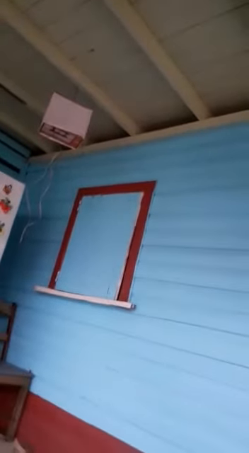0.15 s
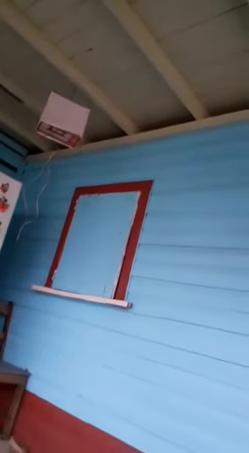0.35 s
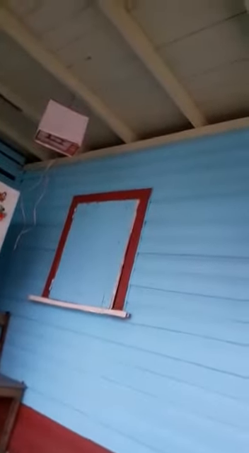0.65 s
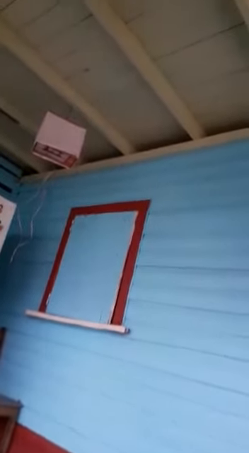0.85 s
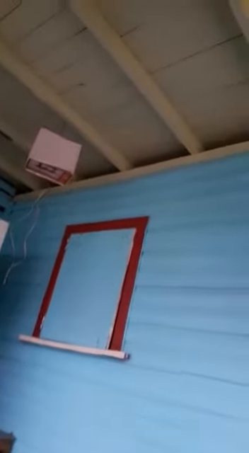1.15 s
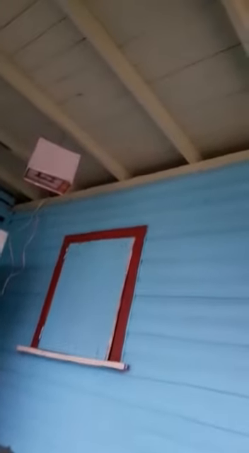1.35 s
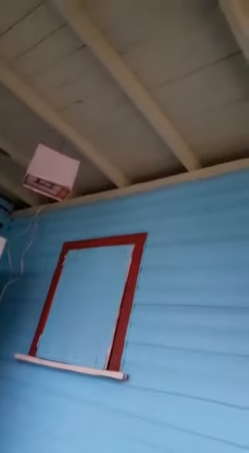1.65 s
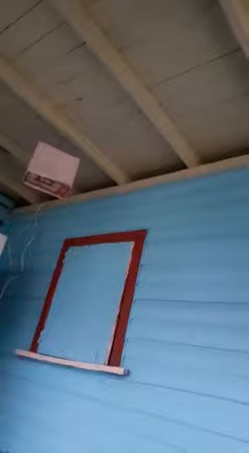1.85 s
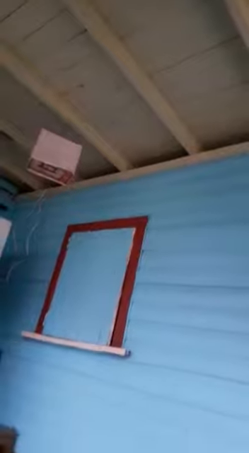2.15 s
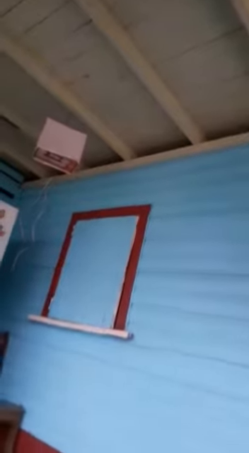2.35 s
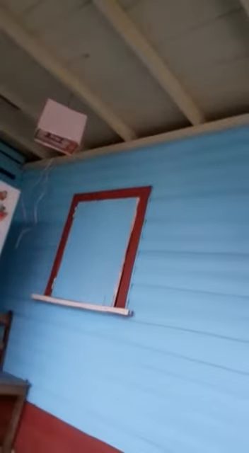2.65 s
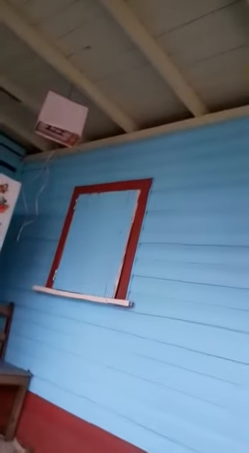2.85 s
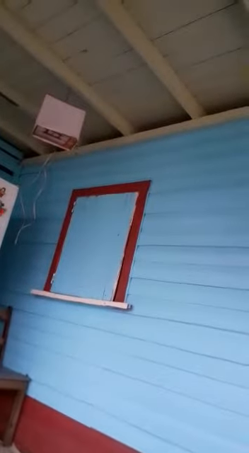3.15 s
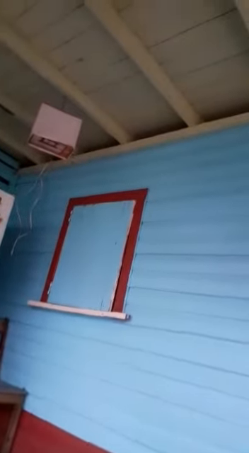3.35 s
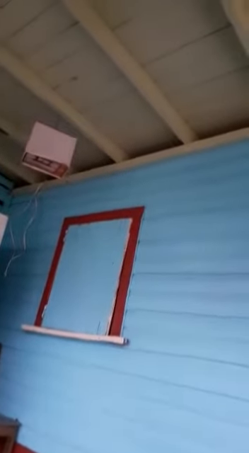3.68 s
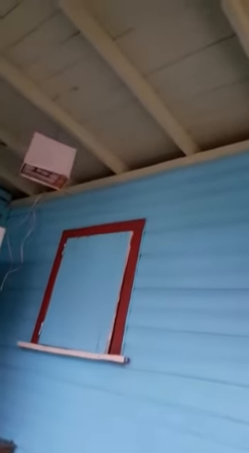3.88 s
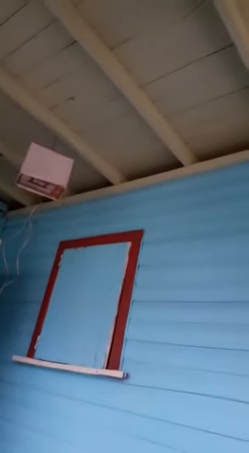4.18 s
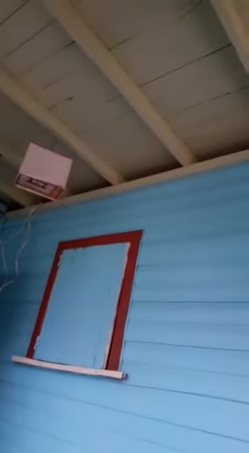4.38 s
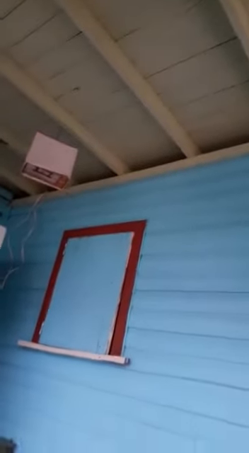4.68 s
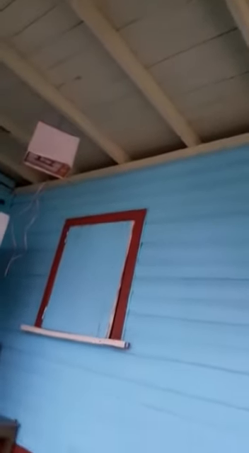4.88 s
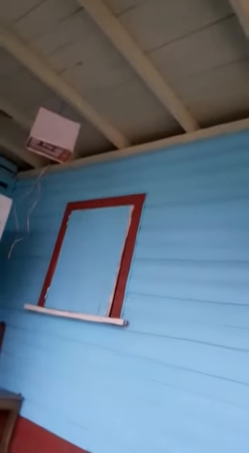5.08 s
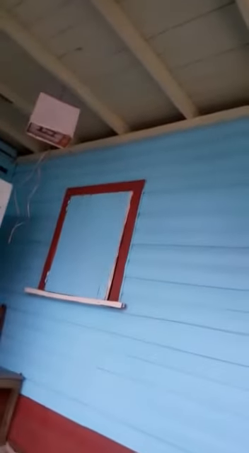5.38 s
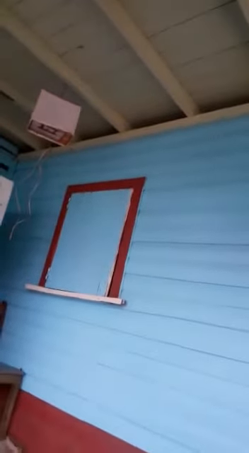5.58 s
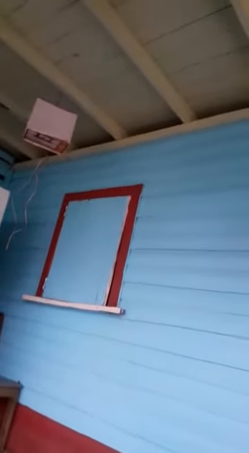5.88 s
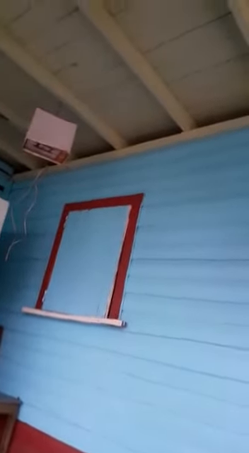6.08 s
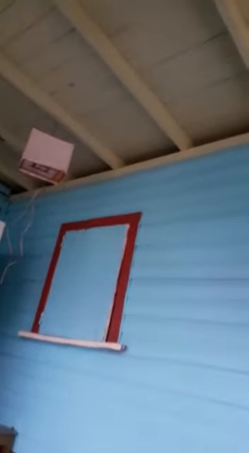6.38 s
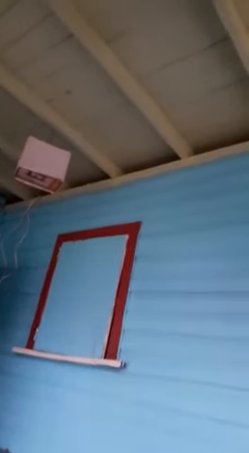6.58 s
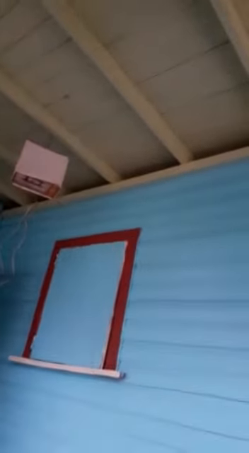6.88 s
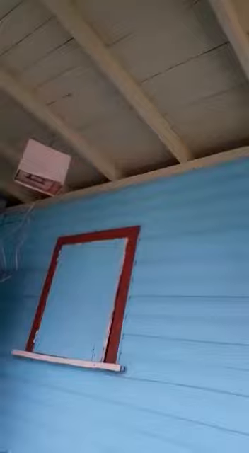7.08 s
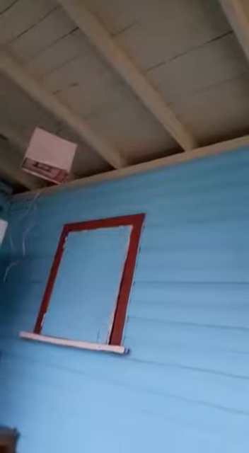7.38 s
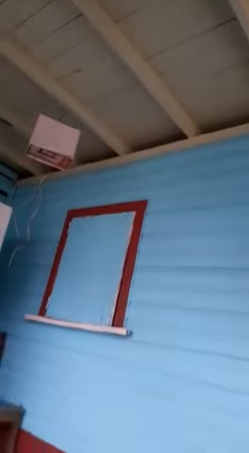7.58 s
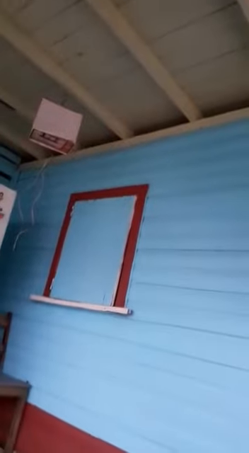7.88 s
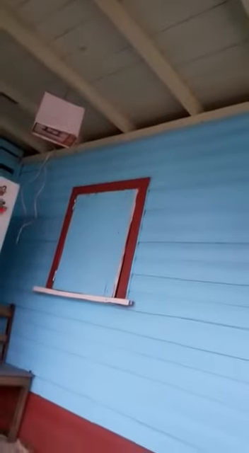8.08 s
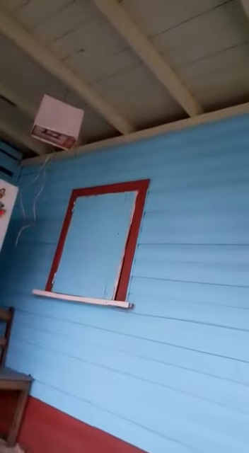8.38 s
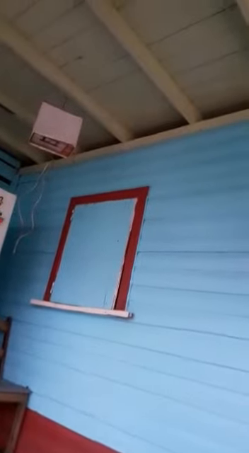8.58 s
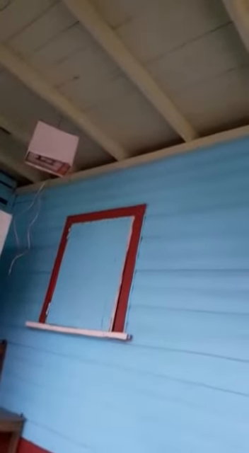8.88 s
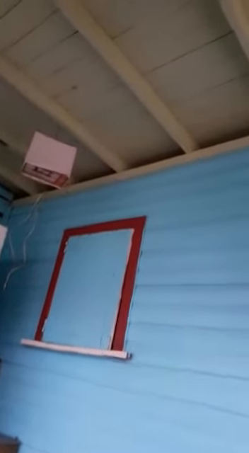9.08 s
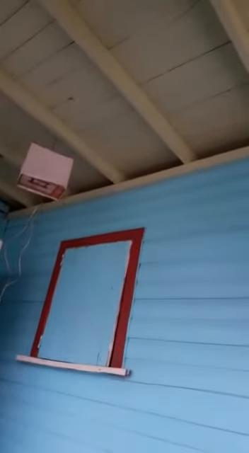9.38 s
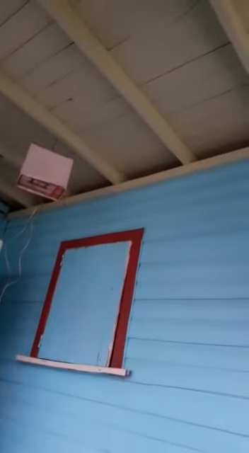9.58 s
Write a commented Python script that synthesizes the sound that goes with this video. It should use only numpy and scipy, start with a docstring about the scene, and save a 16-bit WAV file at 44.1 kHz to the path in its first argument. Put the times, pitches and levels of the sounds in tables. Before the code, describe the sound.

A quiet wooden room with a low airy rush, faint motor hum and high outdoor hiss. Thin high whistles and blurred burry calls come from distant birds, with soft wooden bumps and tiny ticks. Near seven seconds a close caged songbird starts timidly, then sings bright rising whistles, four rapid down-sweeps and a short falling note. A handheld stereo microphone catches the room's short reflections.

```python
"""In a wooden room a caged songbird sings six rising whistles, four quick down-sweeps and a falling last note.
Other birds call further off, some in thin high whistles, some burry and blurred by the walls.
The birds are gliding tones in room reflections; soft wooden bumps, ticks and scrapes are struck or rubbed noise.
A faint motor hum of wavering sines lies under a low rush, an outdoor wash and a high hiss of shaped noise."""
import sys
import numpy as np
from scipy import signal
from scipy.fft import rfft, irfft
from scipy.io import wavfile
from scipy.ndimage import uniform_filter1d

SR = 44100
rng = np.random.default_rng(int(sys.argv[2]) if len(sys.argv) > 2 else 0)


def output_pcm(signal):
    """Save a mono or channel-first signal as 16-bit PCM at the path in sys.argv[1].

    Samples are clipped to [-1, 1] before scaling.
    """
    pcm = np.clip(np.atleast_2d(signal).T, -1, 1) * 32767
    wavfile.write(sys.argv[1], SR, np.round(pcm).astype(np.int16))


N = 429518
TIME = np.arange(N) / SR

# Source levels throughout are dry: before room and panning.
# near bird's whistles, six rising and the last falling: t/s, glide/s, hold/s, start f/Hz, f after glide/Hz,
# final f/Hz, start level/dB, lead-in/s, lead-in level/dB, full voice level/dB, fade by the end/dB
WHISTLES = [ (6.797, 0.13, 0.043, 3760, 4704, 4620, -69, 0.028, -53, -45, 6.5),
            (7.126, 0.2, 0.055, 3505, 4564, 4474, -63, 0.06, -45.5, -27, 5.5),
            (7.536, .205, 0.038, 3383, 4570, 4592, -54.5, 0.12, -22, -14, 2),
            (7.98, .222, 0.036, 3086, 4467, 4294, -66.5, .11, -22, -19, 4),
            (8.371, .175, .03, 3016, 3693, 3610, -47, 0.11, -33.5, -21, 8),
            (8.671, 0.14, .056, 3800, 5267, 4415, -50, 0.032, -31, -19.5, 2),
            (9.326, 0.12, 0.016, 3476, 2746, 2650, -48, 0.021, -41.5, -31.5, 2)]
# a whistle creeps in softly, opens suddenly, glides in an S-curve and hooks to its final pitch
CREEP_BEND, OPEN_S, GLIDE_EASE, HOOK_S = 1.7, 0.012, 0.34, 0.024
# at its very end a whistle dies away
RELEASE_S, RELEASE_DB = 0.019, -9.5
# near bird's quick down-sweeps: t/s, start f/Hz, level/dB
SWEEPS = [(9.004, 5770, -26.5), (9.078, 5770, -27), (9.160, 5490, -26), (9.250, 4710, -29.5)]
# each falls ever faster to the same low pitch and is loudest in the middle
SWEEP_S, SWEEP_END_HZ, SWEEP_BEND, SWEEP_EDGE_DB = 0.033, 2310, 2.05, -19.5
# colour of the near bird's overtones on the way to the microphone: f/Hz, level/dB
OVERTONE_COLOUR = [(5500, 0), (6300, -8), (7300, 1), (9000, 4.5), (10700, -12), (12500, -1), (14000, 0.5),
                   (15600, 9.5)]
# strength of the straight path as the near bird turns its head: t/s, level/dB
FACING = [(6.9, -16), (7.3, 0.5), (7.75, -2), (8.8, -1.5), (9.05, -10), (9.45, 4)]

# thin high whistles of other birds: t/s, length/s, start f/Hz, end f/Hz,
# bend (1 straight, more turns late), level/dB
THIN_WHISTLES = [(0.321, 0.16, 6330, 5300, 1.9, -52), (.78, .33, 6855, 5450, 3.8, -53.5),
                 (1.47, .29, 6960, 7320, 1.1, -51.5), (2.09, .30, 7320, 7940, 1.0, -53.5),
                 (4.69, 0.082, 5180, 3260, 1.1, -63.5), (9.468, 0.38, 6845, 5500, 3.8, -60)]
THIN_EDGE_DB = -1.5

# distant burry slurs: t/s, length/s, start f/Hz, level/dB
SLURS = [(0, .08, 3620, -61), (0, 0.087, 7900, -57.5), (0.262, 0.15, 4160, -57.5),
         (.657, 0.073, 8000, -58.5), (0.678, 0.14, 4165, -57.5), (1.086, .15, 4155, -59),
         (1.398, .17, 4165, -57.5), (1.802, .15, 4244, -57), (2.216, .18, 4144, -57.5),
         (2.384, 0.083, 8230, -60), (2.808, .10, 5130, -61), (4.592, 0.054, 4100, -70),
         (5.069, 0.098, 4820, -63), (6.661, 0.12, 8230, -68), (8.225, .08, 8400, -57)]
# every slur ends at the same share of its starting pitch
SLUR_DROP, SLUR_BURR_HZ = 0.73, 308
# distant long dives that grow louder as they fall: t/s, length/s, level at the end/dB
DIVES = [(7.42, .27, -53.5), (7.83, .26, -54), (8.549, .24, -56), (9.326, 0.12, -53.5)]
DIVE_FROM_HZ, DIVE_TO_HZ, DIVE_SWELL_DB, DIVE_BURR_HZ = 10100, 6150, 19, 210
# distant single peeps: t/s, length/s, f/Hz, level/dB
PEEPS = [(.57, 0.028, 8470, -62), (1.155, 0.045, 9220, -65), (1.313, 0.082, 5830, -66),
         (1.62, .14, 9400, -73), (1.828, .18, 9600, -69), (2.19, 0.058, 5800, -67),
         (7.765, .045, 6180, -58.5), (8.17, 0.082, 6130, -59), (8.34, 0.12, 6120, -59.5),
         (9.014, 0.144, 6270, -54)]
PEEP_DROP, PEEP_BURR_HZ = 0.96, 95
# a peep swells from a soft start (against its middle)
PEEP_ONSET_DB, PEEP_END_DB = -6.5, 2
# two distant birds each repeat one peep: first t/s, until t/s, period/s, length/s, f/Hz, level/dB, burr/Hz
PEEP_SERIES = [(2.74, 7, .392, 0.14, 6930, -73, 170), (1.30, 7.3, .925, .19, 5130, -71.5, 125)]

# soft bumps on wood: t/s, peak level/dB, bass boost of modes below 150 Hz/dB
BUMPS = [(2.005, -37.5, 2), (2.288, -41.5, -2), (2.513, -43.5, 9), (2.628, -38, -2), (3.175, -42, -3),
         (3.485, -45, -4), (3.904, -40, -18), (4.344, -44.5, 0)]
# ringing modes of the wood: f/Hz, relative level/dB, t60/s
WOOD_MODES = [(71.5, -16, 0.48), (112, -15.5, 0.34), (172, -5, 0.25), (289, -2, 0.22), (426, 4, 0.049),
              (513, -2, 0.073), (652, -5.5, 0.056), (817, -6, 0.071), (1270, -7, .025), (1830, 2, 0.022)]
# small dry ticks: t/s, peak level/dB
TICKS = [(1.765, -52), (2.281, -43), (2.305, -46), (2.812, -48), (3.213, -48), (3.24, -51), (3.29, -53),
         (3.489, -55), (3.813, -54)]
# brief soft scrapes: t/s, length/s, resonance f/Hz, level/dB
SCRAPES = [(2.552, 0.033, 1820, -61), (4.058, 0.11, 1830, -65), (4.326, 0.086, 1810, -65),
           (7.241, 0.11, 1630, -70.5)]

# motor hum lines: f/Hz, rms level/dB
HUM_LINES = [(119.5, -74), (202, -67), (242.2, -57), (363, -69), (473, -74)]
# relative spectrum of the indoor rush: f/Hz, level per Hz/dB
RUSH_SPECTRUM = [(25, -44), (40, -28), (60, -13), (120, -11), (185, -9), (228, 1.9), (262, -4), (345, -3),
                 (430, -11), (570, -18), (1200, -32), (5000, -50)]
# how alike the two sides of the rush are: f/Hz, likeness (0-1)
LIKENESS = [(60, .93), (150, .97), (300, .88), (600, .7), (1200, .4), (8000, 0)]
# relative spectrum of the outdoor wash: f/Hz, level per Hz/dB
WASH_SPECTRUM = [(60, -49.5), (280, -27), (550, -5.5), (820, 0.5), (1150, -4.5), (1450, -9.5), (2000, -13),
                 (2700, -22.5), (5000, -35), (12000, -30)]
# shared base level of rush and wash, each with its own offset: t/s, level/dB
BACKGROUND_LEVEL = [(0.0, -64), (4.31, -65), (4.61, -66.5), (7.35, -66), (9.74, -67)]
# relative spectrum of the high outdoor hiss with a faint insect band: f/Hz, level per Hz/dB
HISS_SPECTRUM = [(300, -35.5), (2000, -8.5), (3200, 8.5), (5600, 4), (6900, 10), (7350, 11), (7750, 4),
                 (9000, 4.5), (10200, -7), (15500, -2.5)]
# level of the hiss: t/s, level/dB
HISS_LEVEL = [(0, -62.5), (2.5, -62.5), (2.75, -67.5), (6.4, -71.5), (7.3, -66), (9.74, -67)]
TOP_HZ = 15760


def undb(db):
    """Decibels to gain."""
    return 10 ** (np.asarray(db) / 20)


def curve(rows):
    """Rows (t/s, value) joined by straight lines."""
    return np.interp(TIME, *np.transpose(rows))


def on_log_axis(rows, count=N):
    """Rows (f/Hz, value) read at every bin of a spectrum."""
    hz, value = np.transpose(rows)
    bins = np.fft.rfftfreq(count, 1 / SR)
    return np.interp(np.log(bins + 1), np.log(hz), value)


def noise(rows, count=N):
    """Noise of rms 1, coloured by a spectrum (f/Hz, level/dB)."""
    white = rng.standard_normal(count)
    x = irfft(rfft(white) * undb(on_log_axis(rows, count)), count)
    return x / x.std()


def walk(rate, count=N):
    """Smooth chance of spread near 1, heading for a new value rate times a second."""
    step = np.arange(count) / SR * rate
    return np.interp(step, np.arange(4096), rng.standard_normal(4096))


def add(track, start, sound):
    """Mix a sound into a track from a start time on."""
    i = int(np.clip(start * SR, 0, N - 1))
    track[i:i + len(sound)] += sound[:N - i]


def pan(x, right_db):
    """Lean a sound to the right by a level difference; negative leans left."""
    return x * undb(np.array([[-right_db], [right_db]]) / 2)


def room(x, direct, wet_db, t60, lag_s=0.00016):
    """The straight path reaches the left side first; dense decaying reflections off the boards follow."""
    t = np.arange(SR) / SR
    build_up = 1 - np.exp(-(t / 0.004) ** 2)
    tail = rng.standard_normal((2, SR)) * undb(-60 * t / t60) * build_up
    tail = tail * undb(wet_db) / np.sqrt(np.sum(tail ** 2, axis=1, keepdims=True))
    straight = np.array([x, np.roll(x, int(lag_s * SR))])
    return direct * straight + signal.fftconvolve(x[None], tail, axes=1)[:, :N]


def whistle(note, overtones=(), waver=0.003, flutter_db=1.0, edge_s=0.004, waver_rate=220):
    """One note of the syrinx: a tone along a contour (t/s, f/Hz, level/dB), burry from quick pitch waver."""
    s, hz, db = np.transpose(note)
    s = np.sort(s)
    t = np.arange(s[0], s[-1] + 1 / SR, 1 / SR)
    level = np.interp(t, s, db)
    smooth_hz = uniform_filter1d(np.interp(t, s, hz), size=180)
    pitch = smooth_hz * (1 + waver * walk(waver_rate, len(t)))
    phase = 2 * np.pi * np.cumsum(pitch) / SR
    tone = np.sin(phase)
    for k, overtone_db in enumerate(overtones, 2):
        # harder blowing brings out the overtones
        strength = undb(overtone_db + 0.083 * (level + 24.0))
        below_limit = k * pitch < SR / 2
        tone = tone + strength * np.sin(k * phase) * below_limit
    to_edge = np.minimum(t - t[0], t[-1] - t)
    gate = np.sin(np.pi / 2 * np.clip(to_edge / edge_s, 0, 1)) ** 2
    return np.sqrt(2) * tone * gate * undb(level + flutter_db * walk(87.5, len(t)))


def caged_bird():
    """Loud syrinx whistles whose third harmonic is driven harder than the second and fourth."""
    song_track, facing = np.zeros(N), undb(curve(FACING))
    for note in song():
        sound = whistle(note, overtones=(-36, -31, -46), waver=0.0052, flutter_db=3.5, edge_s=0.0031)
        add(song_track, note[0][0], sound)
    coloured = irfft(rfft(song_track) * undb(on_log_axis(OVERTONE_COLOUR)), N)
    above_10k = np.fft.rfftfreq(N, 1 / SR) > 10000
    overtones = irfft(rfft(coloured) * above_10k, N)
    body = coloured - overtones
    voice = room(body, direct=0.9 * facing, wet_db=-9.5, t60=0.31, lag_s=0.00019)
    # the nearest wall and the ceiling answer within a few milliseconds and blur the quick sweeps
    nearby = room(body, direct=0, wet_db=-7.5, t60=0.09)
    # the highest overtones beam from the beak, so they fade most when the head turns
    sparkle = room(overtones * facing, direct=0.7, wet_db=0, t60=0.22)
    return pan(voice + nearby, right_db=4.5) + pan(sparkle, right_db=-1.5)


def song():
    """The near bird's phrase: its whistles and a run of down-sweeps."""
    sweeps = [glide(start, SWEEP_S, hz, SWEEP_END_HZ, SWEEP_BEND, db, SWEEP_EDGE_DB)
              for start, hz, db in SWEEPS]
    return [sung(*row) for row in WHISTLES] + sweeps


def sung(start, glide_s, hold_s, from_hz, to_hz, final_hz, start_db, lead_s, lead_db, db, fade_db):
    """Contour of a whistle that opens up while it glides, then hooks to its final pitch."""
    t = np.linspace(0, glide_s + hold_s, 120)
    u = np.minimum(t / glide_s, 1)
    way = u + GLIDE_EASE * (np.sin(np.pi / 2 * u) ** 2 - u)
    hook = (final_hz - to_hz) * np.clip((t - glide_s) / HOOK_S, 0, 1)
    hz = from_hz + (to_hz - from_hz) * way + hook
    creep = (start_db - lead_db) * np.maximum(1 - t / lead_s, 0) ** CREEP_BEND
    opening = np.interp(t, [lead_s, lead_s + OPEN_S, t[-1]], [lead_db, db, db - fade_db])
    release = RELEASE_DB * np.maximum(1 - (t[-1] - t) / RELEASE_S, 0)
    return np.transpose([start + t, hz, creep + opening + release])


def glide(start, length, from_hz, to_hz, bend, db, edge_db):
    """Contour of a one-way glide, loudest in the middle; with more bend it turns later."""
    u = np.linspace(0, 1, 30)
    hz = from_hz + (to_hz - from_hz) * u ** bend
    level = db + edge_db * (2 * u - 1) ** 2
    return np.transpose([start + length * u, hz, level])


def thin_bird():
    """Very high glides without overtones, from across the room."""
    out = np.zeros(N)
    for row in THIN_WHISTLES:
        note = glide(*row, THIN_EDGE_DB)
        add(out, note[0][0], whistle(note, waver=0.008, flutter_db=2, edge_s=0.008))
    heard = room(out, direct=0.5, wet_db=-1.5, t60=0.42)
    return pan(heard, right_db=6)


def far_birds():
    """Burry calls that arrive almost only by reflection."""
    out = np.zeros(N)
    for note, burr_hz in far_calls():
        mean_hz = np.mean(note, axis=0)[1]
        sound = whistle(note, waver=burr_hz / mean_hz, flutter_db=2.5, edge_s=0.015, waver_rate=600)
        add(out, note[0][0], sound)
    return pan(room(out, direct=0.25, wet_db=4, t60=0.65), right_db=4.5)


def far_calls():
    """Every distant slur, dive and peep as (contour, burr/Hz)."""
    calls = [(slur(start, length, hz, hz * SLUR_DROP, db), SLUR_BURR_HZ)
             for start, length, hz, db in SLURS]
    for start, length, db in DIVES:
        dive = [(start, DIVE_FROM_HZ, db - DIVE_SWELL_DB), (start + length, DIVE_TO_HZ, db)]
        calls.append((dive, DIVE_BURR_HZ))
    calls += [(peep(*row), PEEP_BURR_HZ) for row in PEEPS]
    for first, until, period, length, hz, db, burr_hz in PEEP_SERIES:
        calls += [(peep(start, length, hz, db), burr_hz) for start in np.arange(first, until, period)]
    return calls


def slur(start, length, from_hz, to_hz, db, sag=0.58, onset_db=0.5, end_db=-4):
    """Contour of a call that falls faster in its first half than in its second."""
    middle_hz = from_hz + sag * (to_hz - from_hz)
    return [(start, from_hz, db + onset_db),
            (start + length / 2, middle_hz, db),
            (start + length, to_hz, db + end_db)]


def peep(start, length, hz, db):
    """Contour of a nearly level call that swells."""
    return slur(start, length, hz, hz * PEEP_DROP, db, onset_db=PEEP_ONSET_DB, end_db=PEEP_END_DB)


def bumps():
    """Soft blows: each rings the modes of the wood and scuffs it for a moment."""
    out, t = np.zeros(N), np.arange(SR // 3) / SR
    scuff_spectrum = [(100, -8), (300, 12), (550, 0.5), (900, -3.5), (1400, -10), (3000, -15.5), (9000, -31)]
    for start, db, bass_db in BUMPS:
        # every blow excites slightly different pitches
        detune = 1 + 0.019 * rng.standard_normal(len(WOOD_MODES))
        ring = np.zeros(len(t))
        for (hz, mode_db, t60), k in zip(WOOD_MODES, detune):
            decay = undb(mode_db + bass_db * (hz < 150) - 60 * t / t60)
            ring += decay * np.sin(2 * np.pi * hz * k * t)
        scuff = noise(scuff_spectrum, count=len(t)) * np.exp(-t / 0.03)
        # a soft contact takes a few milliseconds to build up
        blow = (ring + 0.6 * scuff) * (1 - np.exp(-t / 0.0065))
        add(out, start, undb(db) * blow / np.abs(blow).max())
    return pan(room(out, direct=0.87, wet_db=-3, t60=0.15), right_db=5)


def scrapes():
    """Light uneven rubbing: noise that sings in one broad resonance."""
    out = np.zeros(N)
    for start, length, hz, db in SCRAPES:
        count = int(length * SR)
        resonance = [(hz / 3, -22), (hz * 0.9, -10), (hz, 0), (hz * 1.08, -12), (hz * 2, -35)]
        rub = noise(resonance, count=count)
        add(out, start, rub * np.hanning(count) * undb(db + 2.3 * walk(70, count)))
    return pan(room(out, direct=1.0, wet_db=-0.5, t60=0.56), right_db=10)


def ticks():
    """Tiny dry contacts, as of claws and beak on the cage: short bright noise bursts."""
    out, t = np.zeros(N), np.arange(SR // 20) / SR
    for start, db in TICKS:
        grain = noise([(500, -10), (2000, 0), (8000, -1), (15000, -9)], count=len(t))
        tick = grain * t * np.exp(-t / 0.003)
        add(out, start, undb(db) * tick / np.abs(tick).max())
    return room(out, direct=0.8, wet_db=-3, t60=0.25)


def hum():
    """Steady motor lines: sines that swell, sink and drift in pitch a little."""
    lines = np.zeros(N)
    for hz, db in HUM_LINES:
        phase = 2 * np.pi * np.cumsum(hz + 0.5 * walk(4.4)) / SR
        lines += undb(db + 0.86 * walk(4.7)) * np.sin(phase)
    return pan(np.sqrt(2) * lines, right_db=2.6)


def air(rush_db=10.5, wash_db=2):
    """A low rush, alike on both sides in the bass; a diffuse wash and a wide hiss from outside above it."""
    alike = np.clip(on_log_axis(LIKENESS), 0, 1)
    # more likeness puts more of the rush in the middle and less in the side signal
    mid = irfft(rfft(noise(RUSH_SPECTRUM)) * np.sqrt((1 + alike) / 2), N)
    side = irfft(rfft(noise(RUSH_SPECTRUM)) * np.sqrt((1 - alike) / 2), N)
    background_db = curve(BACKGROUND_LEVEL)
    rush = np.array([mid + side, mid - side]) * undb(background_db + rush_db + 0.7 * walk(9))
    wash = np.array([noise(WASH_SPECTRUM), noise(WASH_SPECTRUM)])
    wash = wash * undb(background_db + wash_db + 0.9 * walk(8))
    hiss = np.array([noise(HISS_SPECTRUM), noise(HISS_SPECTRUM)])
    hiss = hiss * undb(curve(HISS_LEVEL) + 0.7 * walk(9))
    return pan(rush, right_db=2.7) + pan(wash, right_db=5.5) + pan(hiss, right_db=2)


def scene():
    """All the birds over the sounds of the house."""
    birds = caged_bird() + thin_bird() + far_birds()
    contacts = bumps() + scrapes() + ticks()
    return birds + contacts + hum() + air()


def record(dry):
    """The recorder cuts the top: a steep elliptic low-pass."""
    top_cut = signal.ellip(10, 0.2, 80, TOP_HZ, fs=SR, output="sos")
    return signal.sosfilt(top_cut, dry)


dry = scene()
out = record(dry)
output_pcm(out)
```